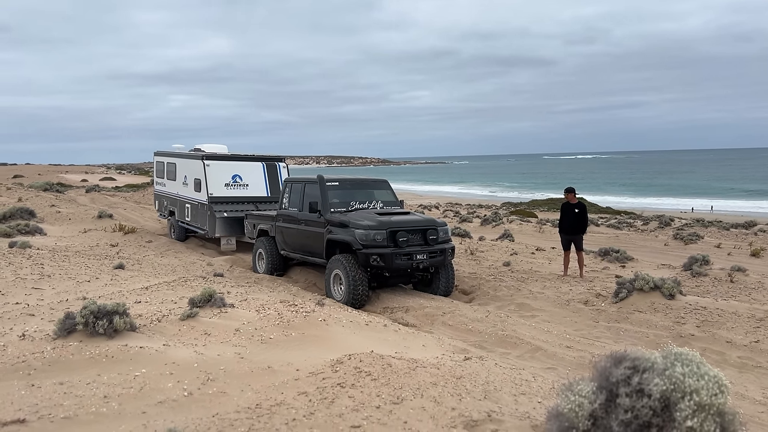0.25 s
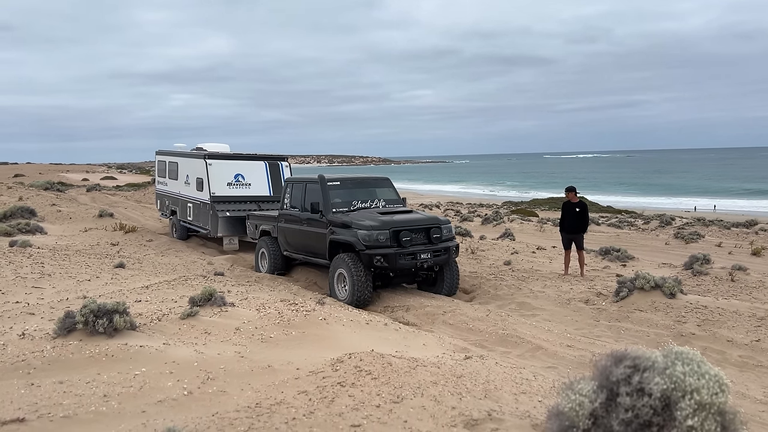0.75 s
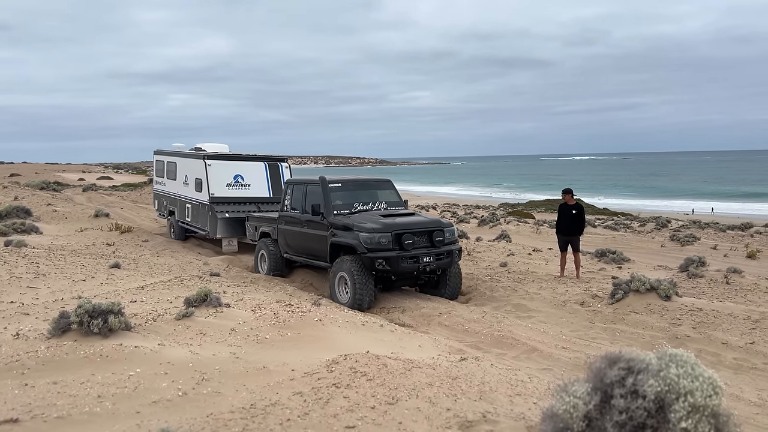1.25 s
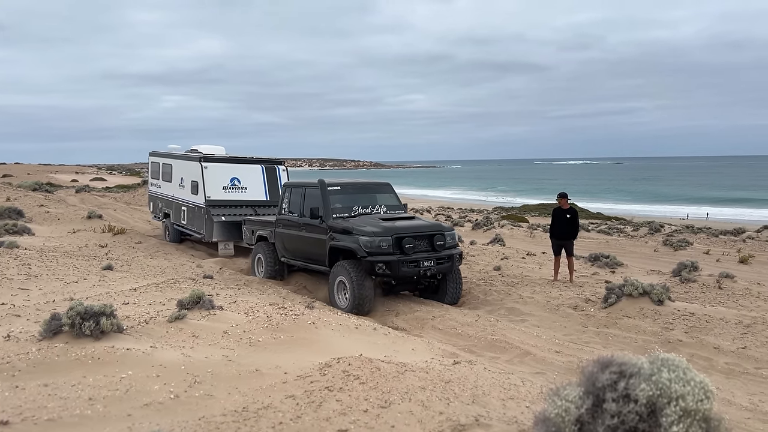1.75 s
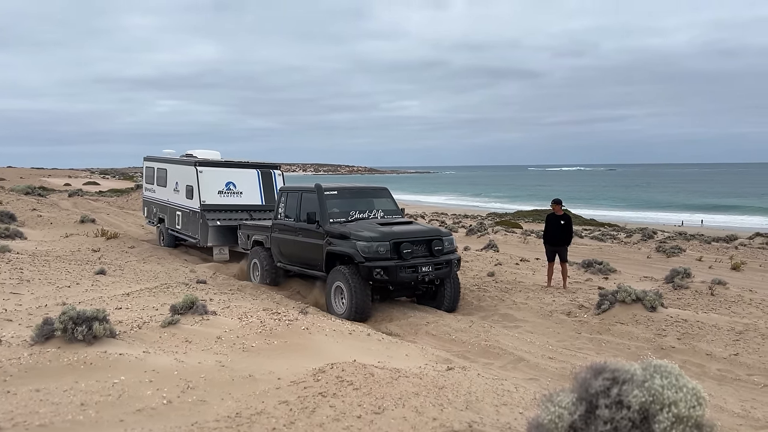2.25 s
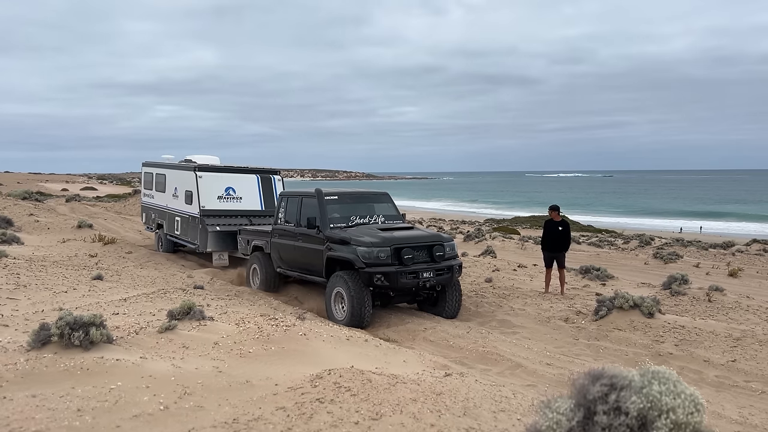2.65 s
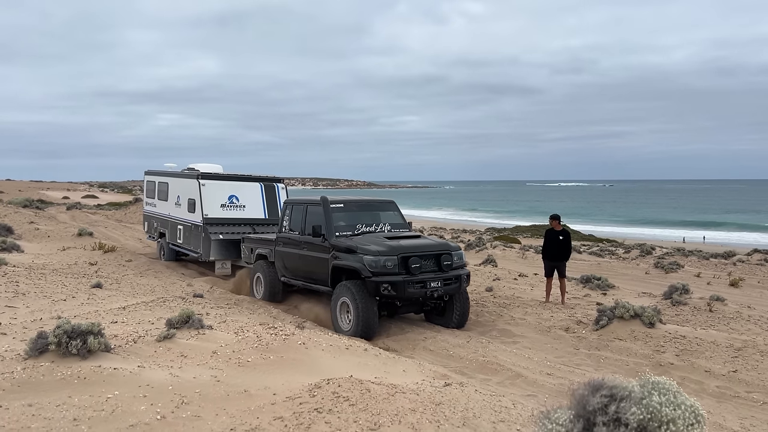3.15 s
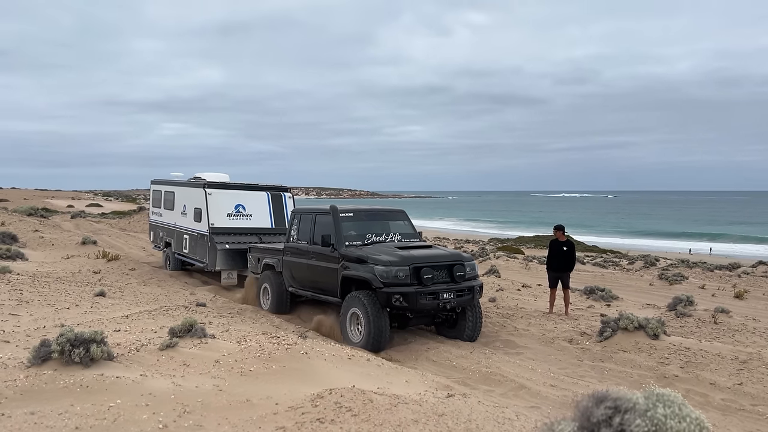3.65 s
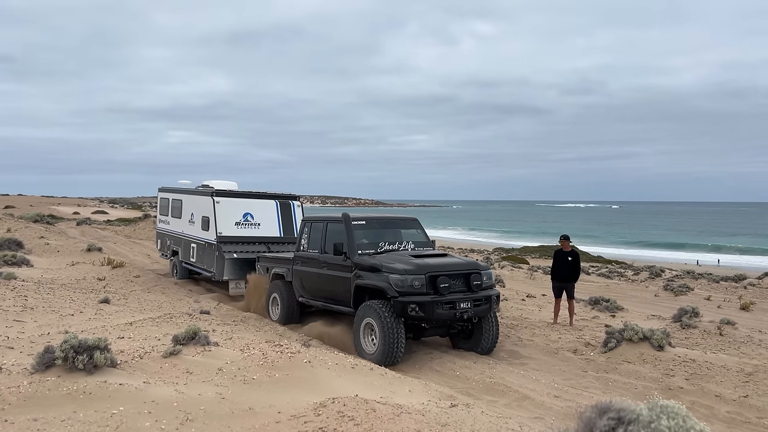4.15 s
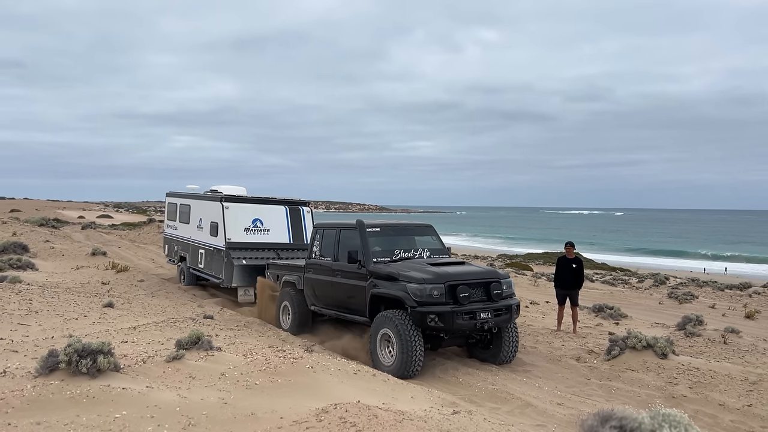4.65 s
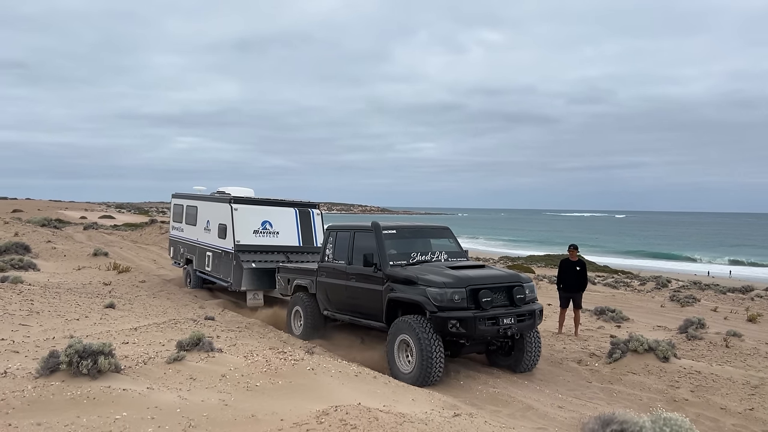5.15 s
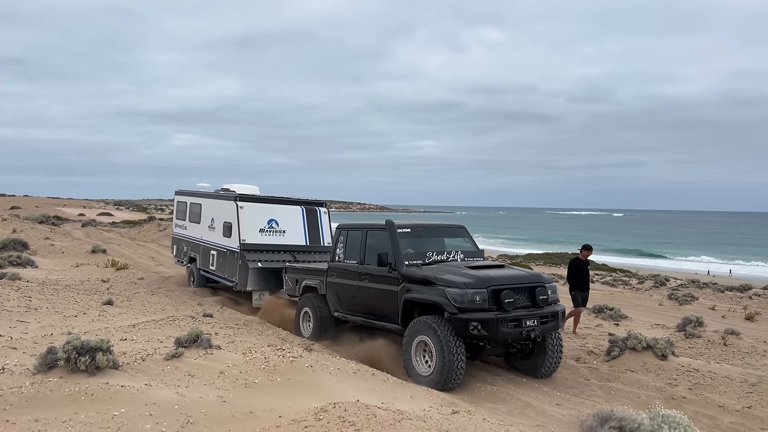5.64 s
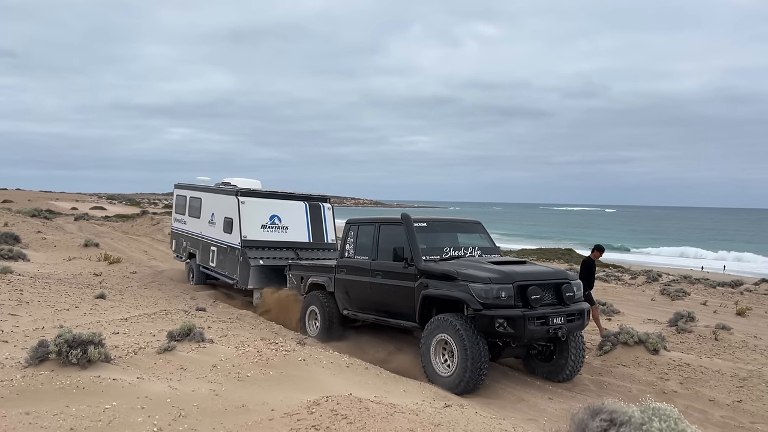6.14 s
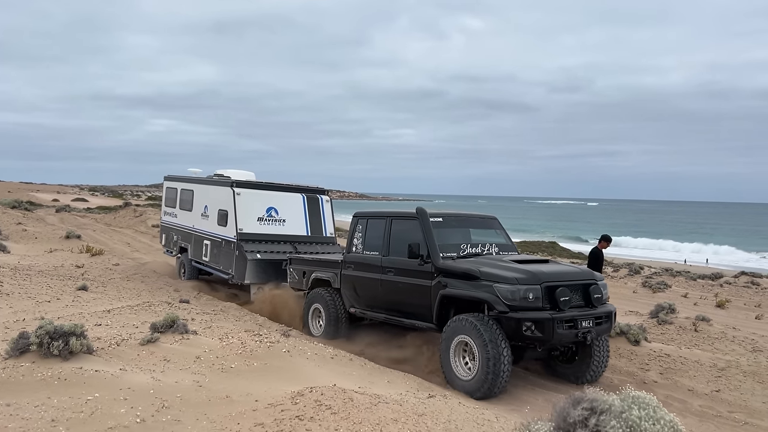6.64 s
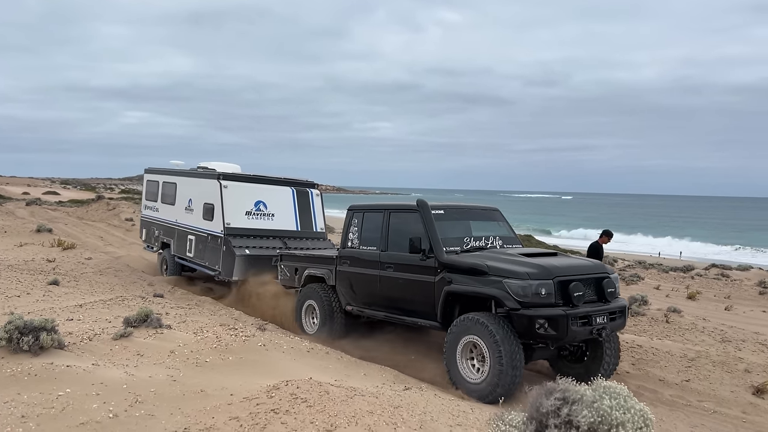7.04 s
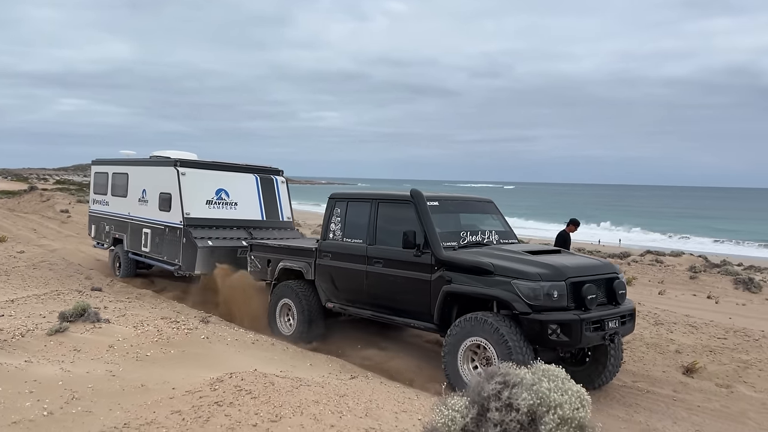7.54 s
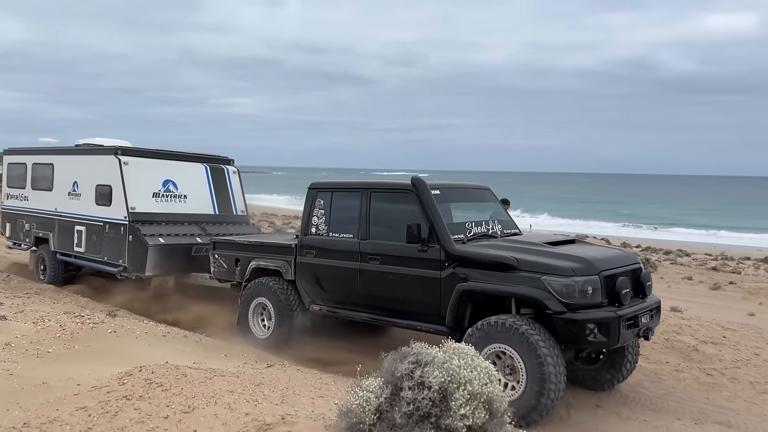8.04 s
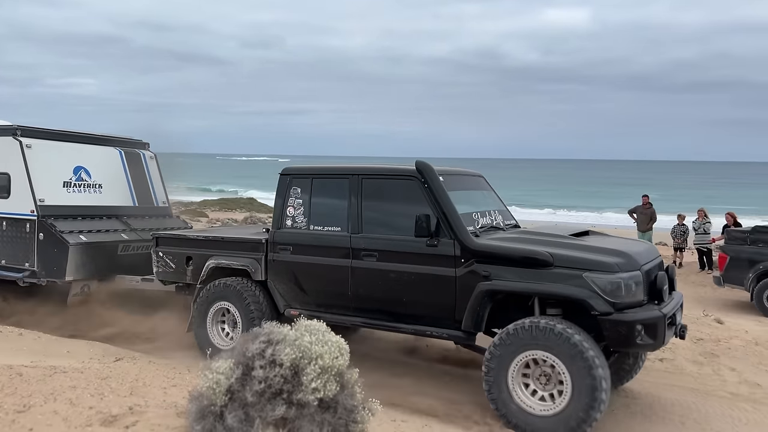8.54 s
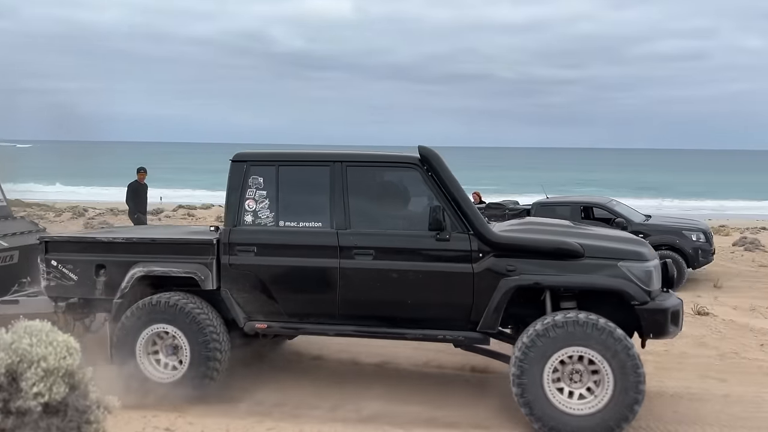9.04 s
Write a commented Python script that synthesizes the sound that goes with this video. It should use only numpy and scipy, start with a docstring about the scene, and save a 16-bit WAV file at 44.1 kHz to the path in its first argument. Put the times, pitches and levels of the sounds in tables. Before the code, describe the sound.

On an open beach, a phone microphone picks up faint surf and gusty low wind, with early flutter. From about 0.2 seconds a V8 diesel truck picks up; a breathy turbo whistle climbs rapidly out of the treble by 1.3. The exhaust swells into a deep, uneven throb around 1.3-2.1, with engine clatter and hissing sand from spinning tyres. Revs ease just after 2 and sag towards 4, the engine labouring in a wavering drone, rise slightly, then bog again around 5.2. From 5.8 they surge, peaking near 7.1, with rasping exhaust, sharp knocks and stronger sand spray. A gear change drops the pitch and briefly softens everything around 7.2-7.4; it climbs again to 7.8, then sinks while still loud and clattering, now nearer and brighter. At 8.8 the driver lifts off; the sound quickly fades, with one soft low thump at 9.1.

```python
"""First a light wind and distant surf, then a V8 diesel four-wheel-drive drags a caravan through soft beach sand.
The turbo is a whistle that climbs with boost, plus hissing air; the spinning tyres are noise in uneven spurts.
The exhaust is tones at multiples of the engine cycle, swelling at resonances, with rushing gas and a buzzing rasp.
Uneven firings ring the engine bay as clatter and sharp knocks. The revs climb, drop with a gear change and
climb again; as the truck draws alongside the driver lifts off, the sound fades and one soft thump follows."""
import sys
import numpy as np
from scipy import signal
from scipy.fft import rfft, irfft, next_fast_len
from scipy.io import wavfile

SR = 44100
rng = np.random.default_rng(int(sys.argv[2]) if len(sys.argv) > 2 else 0)


def master(y):
    """Save y as 16-bit WAV."""
    cut = np.clip(np.atleast_2d(y).T, -1, 1)
    pcm = np.round(cut * 32767)  # scale
    wavfile.write(sys.argv[1], SR, pcm.astype(np.int16))


N = 409688
TIME = np.arange(N) / SR
FREQS = np.maximum(np.arange(N // 2 + 1) * SR / N, 1)

# An "order" is a tone at a whole multiple of the engine cycle; one cycle is two turns of the engine.
# "Relative" levels set the balance inside a layer; the layer's own level is applied later.

# colour of the surf: (frequency [Hz], relative level per Hz [dB])
SURF_COLOUR = [(40, 4), (100, 5), (400, -5), (800, -13), (1600, -21.5), (3500, -26), (8000, -56),
               (15000, -59)]
# colour of the wind's low rumble: (frequency [Hz], relative level per Hz [dB])
WIND_COLOUR = [(20, -30), (32, -29), (48, -11), (62, 0), (85, -4.5), (120, -3.5), (200, -8.5), (500, -48)]
# colour of the gusts' tearing flutter: (frequency [Hz], relative level per Hz [dB])
GUST_COLOUR = [(40, -11), (100, 2), (250, 1.5), (450, -3.5), (700, -9.5), (1100, -20), (2200, -36),
               (4000, -41)]
# strongest gusts: (time [s], half length [s], rumble level [dB], flutter level [dB])
GUSTS = [(0.028, 0.011, -30, -21.5), (0.123, 0.068, -21, -23), (0.423, 0.026, -23, -20.5),
         (0.482, 0.0068, -34, -16.5), (0.568, 0.057, -27, -17.5), (0.74, 0.011, -17.5, -21),
         (0.87, 0.083, -38, -20), (1.085, 0.067, -37, -22), (1.74, 0.14, -17.5, -26),
         (1.844, .008, -17, -14), (3.087, 0.061, -17, -40), (3.28, 0.037, -13.5, -37),
         (3.492, 0.1, -17.5, -21.5), (3.734, 0.049, -15.5, -37), (3.97, 0.018, -22, -42),
         (4.13, 0.077, -16.5, -23), (4.426, 0.14, -18.5, -30), (4.799, 0.034, -17, -25),
         (5.082, 0.018, -21, -43), (5.777, 0.021, -16, -23), (6.45, 0.29, -29.5, -47),
         (7.68, 0.029, -18, -38), (8.5, 0.057, -39, -25)]
# steady wind: level, strength of its eddies, and how often they change
BREEZE_DB, EDDY_DB, EDDIES_PER_S = -28.5, 2.5, 11

# colour of the flung sand: (frequency [Hz], relative level per Hz [dB])
SAND_COLOUR = [(4500, 1), (5400, 2), (6400, 3.5), (8000, 3), (9000, 1.5), (10500, -34), (13000, -42)]
# three layers over time, before the trims below:
# (time [s], clatter level [dB], sand spray level [dB], turbo air level [dB])
LAYER_LEVELS = [(0.0, -83, -70, -70), (0.2, -44.5, -61.5, -59), (0.46, -36.5, -43, -46.5),
                (0.59, -37, -48.5, -50), (0.77, -34.5, -48, -50), (0.88, -32, -41.5, -40),
                (1.16, -30.5, -45, -49), (1.45, -30.5, -42, -51), (1.85, -32.5, -44, -50),
                (2.09, -33, -46.5, -55), (2.19, -30.5, -45, -51), (2.28, -35, -46.5, -55),
                (2.56, -37, -49.5, -57), (2.65, -39, -50.5, -56), (2.76, -39, -50, -56),
                (3.3, -38, -47.5, -55.5), (3.91, -39.5, -45.5, -53.5), (4.76, -38, -47.5, -55.5),
                (5.02, -35.5, -46.5, -51), (5.3, -40.5, -48, -53), (5.98, -30, -42, -44.5),
                (6.26, -27, -43.5, -47), (6.44, -28.5, -39, -43.5), (6.7, -26.5, -40, -42),
                (7.12, -26, -41.5, -46), (7.19, -33, -45, -50), (7.94, -24.5, -38, -41.5),
                (8.36, -25.5, -40.5, -46.5), (8.77, -26.5, -43, -48), (8.85, -36, -49, -56),
                (9, -42, -54, -58), (9.12, -63, -57.5, -63), (9.29, -77, -62, -69)]
CLATTER_TRIM_DB, SAND_TRIM_DB, AIR_TRIM_DB = -2, 2.5, 3.5

# what the thump rings with: (frequency [Hz], decay [s], level [dB])
THUMP_MODES = [(95, .014, -20), (350, .01, -18), (410, .035, -26), (640, .012, -36)]
THUMP_S = 9.122  # after the load comes off

# turbo whistle before wobble and flicker: (time [s], pitch [Hz], level [dB])
WHISTLE = [(0, 4800, -95), (.2, 5200, -72), (.29, 5600, -44), (.45, 6900, -43), (.53, 7750, -48),
           (.62, 8600, -51), (.72, 9900, -55), (.8, 10950, -39), (.87, 11700, -31.5), (.91, 12600, -37),
           (1.04, 14100, -37), (1.08, 14900, -44), (1.15, 15500, -50), (1.35, 16950, -95)]
WHISTLE_WOBBLE, WHISTLE_FLICKER_DB = .011, 3  # wobble is a share of the pitch
# colour of the turbo's air: (frequency [Hz], relative level per Hz [dB])
TURBO_AIR_COLOUR = [(8000, -47), (10000, -3), (11300, 3), (12500, -6.5), (14000, -8), (15500, -11)]

# engine speed: (time [s], speed [rpm])
REVS = [(0.0, 1548.0), (0.5, 1771.0), (1.2, 2353.0), (1.4, 2554.0), (1.6, 2654.0), (1.85, 2814.0),
        (2.0, 2867.0), (2.1, 2621.0), (2.3, 2620.0), (2.55, 2643.0), (2.75, 2448.0), (2.95, 2391.0),
        (3.2, 2374.0), (3.45, 2414.0), (3.65, 2278.0), (3.85, 2207.0), (4.1, 2222.0), (4.3, 2278.0),
        (4.6, 2378.0), (4.9, 2486.0), (5.05, 2339.0), (5.2, 2168.0), (5.4, 2182.0), (5.55, 2222.0),
        (5.8, 2405.0), (6.0, 2627.0), (6.25, 2854.0), (6.45, 3272.0), (6.6, 3430.0), (6.9, 3730.0),
        (7.12, 3879.0), (7.25, 3768.0), (7.37, 3223.0), (7.6, 3284.0), (7.8, 3468.0), (7.92, 3435.0),
        (8.05, 3178.0), (8.1, 3036.0), (8.2, 2970.0), (8.4, 2978.0), (8.6, 2846.0), (8.76, 2845.0),
        (8.88, 2670.0), (9.29, 2266.0)]
SPEED_FLUTTER = .0006  # share of the speed
# how hard the engine pulls, through boost, bogging down, gear change and lift-off: (time [s], effort [dB])
EFFORT = [(0, -12.5), (.95, -13), (1.19, -8), (1.33, 0), (2.6, 0), (4, 0.5), (5.4, -2.5), (6.15, 1),
          (7.12, -2), (7.25, -4.5), (7.38, -1), (8.2, 2), (8.79, -0.5), (8.9, -6.5), (9.29, -24)]
# from the truck's heading to the listener, 0 head-on, 90 abreast: (time [s], bearing [degrees])
BEARING = [(0, 24.4), (3, 26.15), (5.2, 32.5), (6.1, 41.6), (7.2, 54.3), (8.2, 66.2), (9.29, 84.4)]
FLANK_FROM_DEG, FLANK_OVER_DEG = 30.4, 18.3  # where the flank comes into view, and over what angle
SPUTTER_DB = 2.8  # how unevenly the engine labours

# sharp knocks in every cycle: (place in the cycle [0-1], relative level [dB])
KNOCK_PATTERN = [(0, 0), (.22, -2), (.38, -9), (.58, -8), (.82, -8)]
# how hard the engine knocks, before KNOCK_DB: (time [s], relative level [dB])
KNOCKING = [(0, -55), (1.3, -38), (1.8, -26), (2.1, -25), (2.18, -20), (2.3, -26), (2.55, -25), (2.68, -20),
            (2.9, -24), (3.5, -25), (4.2, -29), (4.8, -24), (5.4, -32), (5.75, -26), (5.95, -19),
            (6.3, -17.5), (6.42, -26), (6.65, -20), (7.08, -21), (7.2, -40), (7.38, -21), (7.7, -20),
            (7.96, -17), (8.3, -15), (8.5, -17), (8.76, -20), (8.85, -42), (9.29, -65)]
# single knocks with a moment and level of their own, before KNOCK_DB: (time [s], relative level [dB])
SINGLE_KNOCKS = [(2.196, -15), (2.654, -18), (5.994, -15), (6.172, -15), (6.215, -13), (6.225, -15),
                 (6.258, -14.5), (6.266, -10.5), (6.596, -13), (6.665, -11.5), (8.226, -13.5), (8.266, -13),
                 (8.315, -11.5), (8.437, -14), (8.771, -17)]
KNOCK_DB, KNOCK_SCATTER_DB, KNOCK_JITTER_S = 15.5, 2.2, .00007
RATTLE_DECAY_S, RATTLE_DB = .0035, 0  # short rattle after each knock; level against the knock
# what the knocks ring with, from the front round to alongside:
# (frequency [Hz], width [Hz], relative level [dB])
KNOCK_FRONT = [(700, 120, -1), (1080, 130, -3.5), (1553, 155, 1.5), (2280, 300, -16.5), (3340, 270, -18),
               (3840, 120, -16)]
KNOCK_QUARTER = [(600, 133, 6.5), (1080, 84, 0.5), (1490, 280, 1.5), (2290, 105, 0), (3280, 200, -8),
                 (4070, 470, -17)]
KNOCK_FLANK = [(980, 130, 0.5), (1575, 160, 4), (2670, 85, -5), (3270, 160, -2.5), (4970, 370, -11)]
KNOCK_SIDE = [(750, 140, 6.5), (1075, 94, 3), (1680, 130, -3), (2350, 240, -3), (2810, 130, -2),
              (3500, 220, -12), (4540, 640, -16)]
# which knock resonances are heard from where: (bearing [degrees], resonances [table])
KNOCK_VIEWS = [(28, KNOCK_FRONT), (42, KNOCK_QUARTER), (49, KNOCK_FLANK), (60, KNOCK_SIDE)]

# engine bay resonances, from the front round to alongside:
# (frequency [Hz], width [Hz], relative level [dB])
BAY_FRONT = [(990, 330, -11), (1438, 42, -1), (1617, 73, 2), (2080, 310, -11.5), (2400, 120, -10.5),
             (3165, 280, -10), (3900, 140, -9.5), (4670, 110, -40)]
BAY_BOW = [(966, 35, 4.5), (1090, 25, 3.5), (1276, 38, 1), (1466, 45, 1.5), (1614, 30, -3),
           (1960, 130, -10), (2480, 740, -10.5), (3260, 210, -14.5), (3810, 215, -14.5)]
BAY_QUARTER = [(1007, 39, -3.5), (1374, 51, -7.5), (1645, 40, 1), (1925, 38, -8.5), (2310, 48, -5),
               (2800, 170, -20), (3220, 140, -13.5), (3950, 210, -11)]
BAY_FLANK = [(1015, 21, 5.5), (1490, 110, -9), (2040, 110, -11.5), (2463, 44, -0.5), (2640, 37, -5),
             (2840, 23, -4), (3530, 200, -11.5), (4230, 210, -13.5), (4980, 150, -14.5)]
BAY_SIDE = [(1041, 25, 9.5), (1410, 100, -3), (1647, 41, 7), (1940, 110, -0.5), (2335, 93, 0),
            (2685, 43, 4), (2875, 65, 1.5), (3360, 100, -3), (3760, 180, -9), (4360, 83, -8.5),
            (4900, 450, -15)]
# which bay resonances are heard from where: (bearing [degrees], resonances [table])
BAY_VIEWS = [(25.6, BAY_FRONT), (29, BAY_BOW), (40, BAY_QUARTER), (50, BAY_FLANK), (63, BAY_SIDE)]
CLATTER_ORDERLY = 1.6  # recurring part of the clatter against its random part
ORDER_SPREAD_DB = 2.0  # how much the orders of a recurring pattern differ in strength

# gas rushing from the tailpipe, from the front and from alongside:
# (frequency [Hz], relative level per Hz [dB])
GAS_FRONT = [(50, -21), (90, 6), (140, -0.5), (190, -5.5), (250, 2.5), (310, -9.5), (400, -4.5), (520, -10),
             (700, -15.5), (900, -22), (1200, -24)]
GAS_SIDE = [(50, -11), (90, 1.5), (140, -4), (190, -2.5), (250, -3.5), (310, -4.5), (400, -5), (520, -11.5),
            (700, -11), (900, -28), (1200, -31)]
# upper resonances of the pipe, from the front and from alongside:
# (frequency [Hz], width [Hz], relative level [dB])
RASP_MODES = [(372, 38, 1), (454, 39, -0.5), (550, 39, -1), (676, 23, 6.5), (800, 210, -11), (1073, 24, 0)]
RASP_SIDE = [(460, 77, 3.5), (580, 52, -7), (692, 31, 8.5), (790, 45, -3), (853, 47, 3.5), (1100, 47, -0.5)]
# which rasp resonances are heard from where: (bearing [degrees], resonances [table])
RASP_VIEWS = [(43, RASP_MODES), (58, RASP_SIDE)]
RASP_AIR = 0.25  # random part of the rasp against its recurring part

# what the uneven firing of the two banks leaves in the growl: (order [per cycle], relative level [dB])
GROWL_ORDERS = [(6, 4), (7, 6), (8, 10), (9, 4.5), (10, -2), (12, -1.5), (14, 6.5), (15, 0), (16, 13),
                (17, -1), (18, 11), (19, -6), (20, 1.5), (21, -6), (22, 0), (23, -6), (24, 3), (25, 7.5),
                (26, -5), (27, 11), (28, 4.5)]
# response of the exhaust pipe, from the front and from alongside: (frequency [Hz], relative level [dB])
PIPE_FRONT = [(110, -0.5), (150, -15), (185, -16), (215, -24), (255, 4), (300, -30.5), (365, -8.5),
              (420, -16), (480, -15), (530, -30), (570, -22.5), (740, -29), (1200, -37)]
PIPE_SIDE = [(110, -12), (160, -45), (205, -13), (255, -11.5), (300, -6.5), (345, -26), (410, -18.5),
             (485, -16), (520, -23), (565, -17), (630, -37), (740, -25.5), (1200, -31)]
# level rules of three exhaust layers: (level at 0 dB effort and cruise speed [dB],
# change per dB of effort [dB], change per doubling of speed [dB], change alongside [dB])
GROWL_LAW = (-21, 1.46, 8.5, -5)
GAS_LAW = (-20, 0.82, 5.5, -3)
RASP_LAW = (-31.5, 1.5, -4, 4.5)
CRUISE_RPM = 2500
# orders that boom or sing at a resonance of the pipe or the drive, which beams to one side; orders are rounded:
# (order [per cycle], frequency [Hz], width [Hz], level at 0 dB effort [dB], beam bearing [degrees])
BOOMS = [(8, 176, 10, -18.5, 25), (7.95, 248.5, 22.5, -17, 57.2), (8, 194, 11, -28, 64.4),
         (10, 227, 8.2, -21.5, 23), (11, 231.8, 14, -13.5, 19.7), (11, 258, 24, -14.5, 37),
         (11, 260, 38, -21, 65.3), (14, 290, 31, -27, 33), (15, 282, 12.4, -28, 31),
         (15, 334, 17, -19.5, 18), (15, 413, 96, -24, 47), (16, 378, 39, -25.5, 21), (16, 460, 16, -18, 44),
         (16, 513, 37, -25.5, 44.5), (17, 364, 20, -21, 19.7), (17, 382, 56, -23, 37),
         (17, 463, 32, -25, 67), (18, 360, 34, -28, 36), (18, 426, 67, -20.5, 41), (18, 430, 27, -28, 77),
         (20, 364, 54, -25.5, 38.2), (20, 550, 28, -26.5, 48.3), (22, 463, 32, -24.5, 35.8),
         (22, 670, 60, -28.5, 28), (23, 550, 30, -22, 43), (23, 550, 15, -30, 71),
         (24, 560, 26, -22.5, 35.7), (24, 563, 19, -22.5, 71.4), (27, 490, 22, -33.5, 38),
         (27, 670, 47, -30, 62), (28, 585.5, 27, -27, 30.4), (31, 860, 47, -28, 67.5),
         (31, 767, 43, -31, 70), (32, 850, 28, -29, 68), (33, 900, 30, -34, 68), (32, 890, 25, -35.5, 42),
         (37, 736, 18, -28.5, 23), (45, 1200, 20, -21, 80)]
BEAM_DEG, BOOM_PER_EFFORT = 7.34, 0.48  # spread of a beam; dB per dB of effort, for the drone's order
# deep throb, before wavering: (time [s], level [dB])
THROB = [(0, -31), (1.05, -33.5), (1.2, -24), (1.35, -13.5), (1.68, -8), (1.93, -19), (2.03, -14),
         (2.12, -9.5), (2.6, -12), (2.95, -18.5), (3.4, -17), (3.9, -21), (4.75, -19), (5.3, -21),
         (5.95, -25.5), (6.3, -14), (6.52, -18.5), (6.8, -26), (7.25, -36), (7.38, -20), (8.05, -20),
         (8.35, -21.5), (8.8, -25.5), (9, -41), (9.29, -54)]
# drone that sings while the engine labours, before wavering: (time [s], level [dB])
DRONE = [(0, -36.5), (2.45, -52), (2.8, -25), (3.3, -24.5), (3.65, -15.5), (4.05, -15.5), (4.5, -22),
         (4.95, -22.5), (5.12, -14), (5.45, -20), (5.68, -11), (6, -22), (6.35, -29.5), (6.7, -21),
         (7.05, -22), (7.25, -35.5), (7.9, -26.5), (8.25, -24), (8.6, -16), (8.81, -16.5), (8.92, -39),
         (9.29, -48)]
THROB_ORDER, DRONE_ORDER = 5, 13
THROB_WAVER_DB, BOOM_WAVER_DB = 1.3, 1.56  # unsteadiness of throb and drone, and of the other orders

# phase by which the left port leads the right: (frequency [Hz], lead [radians])
PORT_PHASE = [(20, 0), (2100, .1), (2900, 1.05), (4900, 1.3), (6300, 5.7), (7400, 6.3), (8100, 6.2),
              (8900, 3.8), (10000, 3.15), (10600, 2.9), (13000, 0), (14300, -.1), (15500, -2.8)]
TOP_HZ, FADE_S = 15700, .006  # top of the treble; fade at each end


def undb(db):
    """Turn decibels into gain."""
    return 10 ** (np.asarray(db) / 20)


def unit(x):
    """Scale to rms 1."""
    return x / np.sqrt(np.mean(x ** 2))


def curves(table):
    """Join each column of a table by straight lines over time, one value a sample."""
    s, *columns = np.transpose(table)
    return [np.interp(TIME, s, c) for c in columns]


def response(points, hz):
    """Gain of a (frequency, dB) shape; it falls away steeply beyond its ends."""
    f, db = np.transpose(points)
    outside = np.minimum(1, np.minimum(hz / f[0], f[-1] / hz))
    return undb(np.interp(np.log(hz), np.log(f), db)) * outside ** 4


def colour(x, points):
    """Filter a sound through a (frequency, dB) shape; rms 1."""
    size = next_fast_len(N, True)
    hz = np.maximum(np.arange(size // 2 + 1) * SR / size, 1)
    return unit(irfft(rfft(x, size) * response(points, hz), size)[..., :N])


def walk(rate, time=TIME):
    """Random wandering with about rate new values a second; spread near 1."""
    knots = rng.standard_normal(1024)
    return 1.2 * np.interp(time * rate, np.arange(len(knots)), knots)


def air_noise(spread):
    """Two channels of noise; spread is the size of the part they do not share."""
    mid, side = rng.standard_normal((2, N))
    return unit(mid + spread * side * np.array([[1], [-1]]))


def resonate(x, modes, size=4096):
    """Ring resonances with dark valleys between them: sudden attack, short tail; rms 1."""
    f = np.arange(size // 2 + 1) * SR / size
    power = sum(undb(2 * db) / (1 + ((f - hz) / width) ** 2) ** 2 for hz, width, db in modes)
    # the cepstrum (spectrum of the log spectrum) gives a ring with its energy as early as possible
    cepstrum = irfft(np.log(power))[:size // 2]
    ring = irfft(np.exp(rfft(cepstrum * (np.arange(size // 2) > 0), size)))
    return unit(signal.oaconvolve(np.atleast_2d(x), ring[None], axes=1)[:, :N])


def turning(x, views, bearing):
    """Blend the resonances heard from neighbouring bearings as the truck turns past."""
    angles = [angle for angle, _ in views]
    blend = 0
    for share, (_, modes) in zip(np.eye(len(views)), views):
        blend = blend + np.sqrt(np.interp(bearing, angles, share)) * resonate(x, modes)
    return blend


def surf():
    """Breakers far down the beach: coloured noise that swells slowly."""
    return undb(-31.5 + 0.27 * walk(0.57)) * colour(air_noise(spread=1.0), SURF_COLOUR)


def wind():
    """Eddies rumble on the microphone ports; the strongest gusts also flutter up into the midrange."""
    rumble, flutter = undb(BREEZE_DB + EDDY_DB * walk(EDDIES_PER_S)), 0
    for s, length, rumble_db, flutter_db in GUSTS:
        swell = np.exp(-.5 * ((TIME - s) / length) ** 2)
        rumble = np.hypot(rumble, undb(rumble_db) * swell)
        flutter = flutter + undb(flutter_db) * swell
    low = rumble * colour(air_noise(spread=0.23), WIND_COLOUR)
    tearing = flutter * undb(0.4 * walk(60)) * colour(air_noise(spread=0.58), GUST_COLOUR)
    return low + tearing


def sand(level_db):
    """The spinning tyres fling grains of uneven strength in spurts."""
    grains = air_noise(spread=.4) * undb(3 * rng.standard_normal(N))
    spurts_db = 1.0 * walk(90) + .6 * walk(14)
    return undb(level_db + SAND_TRIM_DB + spurts_db) * colour(grains, SAND_COLOUR)


def thump():
    """One soft blow sets the truck's body ringing low and briefly."""
    start = int(THUMP_S * SR)
    t = TIME[:N - start]
    contact = 1 - np.exp(-t / .002)  # softens the attack
    ring = sum(undb(db) * np.exp(-t / decay_s) * np.sin(2 * np.pi * hz * t) for hz, decay_s, db in THUMP_MODES)
    return np.pad(contact * ring, (start, 0))


def turbo(cycles, air_db):
    """A breathy whistle climbs as boost builds; the compressor's air hisses, throbbing with the engine."""
    whistle_hz, whistle_db = curves(WHISTLE)
    # slow noise shakes the tone's size and phase, so it sounds breathy rather than pure
    breath = colour(rng.standard_normal((2, N)), [(5, 4), (220, 13), (550, -6), (1400, -12)])
    angle = 2 * np.pi * np.cumsum(whistle_hz * (1 + WHISTLE_WOBBLE * walk(45))) / SR
    whistle = breath[0] * np.cos(angle) + breath[1] * np.sin(angle)
    whistle_gain = undb(whistle_db + WHISTLE_FLICKER_DB * walk(40))
    throb = 1 + 0.19 * np.cos(2 * np.pi * THROB_ORDER * cycles)
    air = colour(air_noise(spread=0.023) * throb, TURBO_AIR_COLOUR)
    air_gain = undb(air_db + AIR_TRIM_DB + .3 * walk(70) + 0.65 * walk(9))
    return whistle_gain * whistle + air_gain * air


def knocking(cycles, bearing, size=512):
    """Set points in every cycle crack sharply and rattle briefly, ringing resonances that change with bearing."""
    place, place_db = np.transpose(KNOCK_PATTERN)
    turns = np.arange(1, int(cycles[-1]) - 1)
    times = np.interp((turns[:, None] + place).ravel(), cycles, TIME)
    chance = rng.standard_normal((len(times), size + 2))
    times = times + KNOCK_JITTER_S * chance[:, 1]
    levels = np.interp(times, *np.transpose(KNOCKING)) + np.tile(place_db, len(turns))
    levels = levels + KNOCK_SCATTER_DB * chance[:, 0]
    for s, db in SINGLE_KNOCKS:
        nearest = np.argmin(abs(times - s))
        times[nearest], levels[nearest] = s, db
    tail = np.exp(-TIME[:size] / RATTLE_DECAY_S)
    tail = tail * undb(RATTLE_DB) / np.linalg.norm(tail)
    blows = np.zeros(N + size)
    for start, gain, rattle in zip((times * SR).astype(int), undb(levels + KNOCK_DB), chance[:, 2:]):
        blows[start] += gain
        blows[start:start + size] += gain * tail * rattle
    return np.std(blows) * turning(blows[:N], KNOCK_VIEWS, bearing)


def firings(cycles, count=8):
    """Each cylinder gives a sudden, decaying blow of its own strength, nearly the same on every cycle."""
    index = (cycles * count).astype(int)
    cylinder_db = 1.5 * rng.permutation(np.linspace(-1, 1, count))
    scatter_db = 1.1 * rng.standard_normal(size=4096)
    decay = 0.81 + np.exp(-(cycles * count % 1) / 0.63)
    return undb(cylinder_db[index % count] + scatter_db[index]) * decay


def cycle_pattern(cycles, size=2048):
    """A pressure pattern that returns on every engine cycle; some of its orders are strong, some weak."""
    strength, phase = rng.standard_normal(size // 6), rng.random(size // 6)
    order_gain = undb(ORDER_SPREAD_DB * np.clip(strength, -1.5, 1.5))
    shape = irfft(order_gain * np.exp(2j * np.pi * phase), size)
    return unit(np.interp(cycles % 1 * size, np.arange(size), shape))


def clatter(cycles, blows, level_db, bearing):
    """The firings ring the engine bay, whose resonances shift as the truck turns past."""
    knocks = blows * (CLATTER_ORDERLY * cycle_pattern(cycles) + air_noise(spread=0.65))
    return undb(level_db + CLATTER_TRIM_DB) * turning(knocks, BAY_VIEWS, bearing)


def drive_level(law, effort_db, rpm, beside):
    """Level in dB of an exhaust layer, which shifts with effort, with speed and as the flank comes into view."""
    db, per_effort, per_octave_db, beside_db = law
    return db + per_effort * effort_db + per_octave_db * np.log2(rpm / CRUISE_RPM) + beside_db * beside


def gas(cycles, beside, gas_db):
    """Gas rushes from the tailpipe, pulsing with the throb."""
    pulse = 1 + 0.53 * np.cos(2 * np.pi * THROB_ORDER * cycles)
    rush = air_noise(spread=0.41) * pulse * undb(1.0 * walk(30))
    front, side = colour(rush, GAS_FRONT), colour(rush, GAS_SIDE)
    return undb(gas_db) * (np.sqrt(1 - beside) * front + np.sqrt(beside) * side)


def rasp(cycles, blows, level_db, bearing):
    """The sharp fronts of the exhaust pulses buzz in the pipe's upper resonances."""
    buzz = blows * (cycle_pattern(cycles) + RASP_AIR * air_noise(spread=1.0))
    return undb(level_db) * turning(buzz, RASP_VIEWS, bearing)


def growl(cycle_hz, beside, growl_db):
    """Gain of each growl order as it sweeps through the pipe's response."""
    gains = {}
    speeds = np.linspace(10, 40, 300)  # cycles a second
    for k, db in GROWL_ORDERS:
        front = np.interp(cycle_hz, speeds, response(PIPE_FRONT, round(k) * speeds))
        side = np.interp(cycle_hz, speeds, response(PIPE_SIDE, round(k) * speeds))
        gains[round(k)] = undb(db) * (front + beside * (side - front))
    # hold the orders' combined level at growl_db
    scale = undb(growl_db) / np.sqrt(sum(gain ** 2 for gain in gains.values()))
    return [(k, scale * gain) for k, gain in gains.items()]


def resonance(hz, centre_hz, width_hz):
    """Gain of a resonance for a tone that sweeps across it; 1 at the centre."""
    return 1 / (1 + ((hz - centre_hz) / width_hz * 1.3) ** 2)


def booms(cycle_hz, effort_db, bearing):
    """Gain of orders that swell and fade as the revs cross resonances and the truck turns past."""
    push_db = BOOM_PER_EFFORT * effort_db
    gains = []
    for k, hz, width_hz, db, aim in BOOMS:
        level = undb(db + push_db * np.sqrt(k / DRONE_ORDER))  # higher orders depend more on effort
        beam = np.exp(-.5 * ((bearing - aim) / BEAM_DEG) ** 2)
        gains.append((round(k), level * beam * resonance(round(k) * cycle_hz, hz, width_hz)))
    return gains


def order_tone(cycles, order, waver):
    """One multiple of the engine cycle, its phase shaken by uneven combustion; rms 1."""
    return np.sqrt(2) * np.sin(2 * np.pi * (order * cycles + rng.random()) + waver * walk(22))


def exhaust(cycle_hz, cycles, effort_db, bearing, beside, growl_db, step=100):
    """One wavering tone for each order of throb, drone, growl and booms; gains are set every step samples."""
    slow = slice(None, None, step)
    gains = [(THROB_ORDER, undb(curves(THROB)[0][slow])), (DRONE_ORDER, undb(curves(DRONE)[0][slow]))]
    gains += growl(cycle_hz[slow], beside[slow], growl_db[slow])
    gains += booms(cycle_hz[slow], effort_db[slow], bearing[slow])
    tones = 0
    for order in sorted({k for k, _ in gains}):
        gain = np.sqrt(sum(g ** 2 for k, g in gains if k == order))
        waver_db = THROB_WAVER_DB if order in (THROB_ORDER, DRONE_ORDER) else BOOM_WAVER_DB
        wavering = gain * undb(waver_db * walk(14, TIME[slow]))
        tones = tones + np.interp(TIME, TIME[slow], wavering) * order_tone(cycles, order, waver=.11)
    return tones


def scene():
    """Engine speed and effort drive the exhaust; level curves shape the other layers, with surf and wind around."""
    (rpm,), (effort_db,), (bearing,) = curves(REVS), curves(EFFORT), curves(BEARING)
    clatter_db, sand_db, air_db = curves(LAYER_LEVELS)
    cycle_hz = rpm / 120 * (1 + SPEED_FLUTTER * walk(16))
    cycles = np.cumsum(cycle_hz) / SR
    beside = np.clip((bearing - FLANK_FROM_DEG) / FLANK_OVER_DEG, 0, 1)  # 0 front, 1 flank in full view
    growl_db = drive_level(GROWL_LAW, effort_db, rpm, beside)
    gas_db = drive_level(GAS_LAW, effort_db, rpm, beside)
    rasp_db = drive_level(RASP_LAW, effort_db, rpm, beside)
    blows = firings(cycles)
    # strong and weak firings, partly recurring on each cycle, shake the rasp and, half as much, the clatter
    sputter_db = SPUTTER_DB * (.45 * np.tanh(walk(35)) + .35 * np.cos(2 * np.pi * cycles))
    background = surf() + wind() + sand(sand_db) + thump()
    engine = turbo(cycles, air_db) + knocking(cycles, bearing)
    engine = engine + clatter(cycles, blows, clatter_db + 0.5 * sputter_db, bearing)
    tailpipe = gas(cycles, beside, gas_db) + rasp(cycles, blows, rasp_db + sputter_db, bearing)
    tailpipe = tailpipe + exhaust(cycle_hz, cycles, effort_db, bearing, beside, growl_db)
    return background + engine + tailpipe


def record(dry):
    """A phone's two ports hear the treble out of step; the loudest peaks are rounded and the top is cut."""
    lead = np.interp(FREQS, *np.transpose(PORT_PHASE))
    fade = np.minimum(1, np.minimum(TIME, TIME[::-1]) / FADE_S)
    shift = np.exp(.5j * lead * np.array([[1], [-1]]))  # half the lead on each side
    ports = irfft(rfft(dry * fade) * shift, N) * undb([[-.5], [.5]])
    rounded = ports / (1 + ports ** 8) ** (1 / 8)
    return signal.sosfilt(signal.ellip(8, .2, 70, TOP_HZ, fs=SR, output="sos"), rounded)


dry = scene()
out = record(dry)
master(out)
```